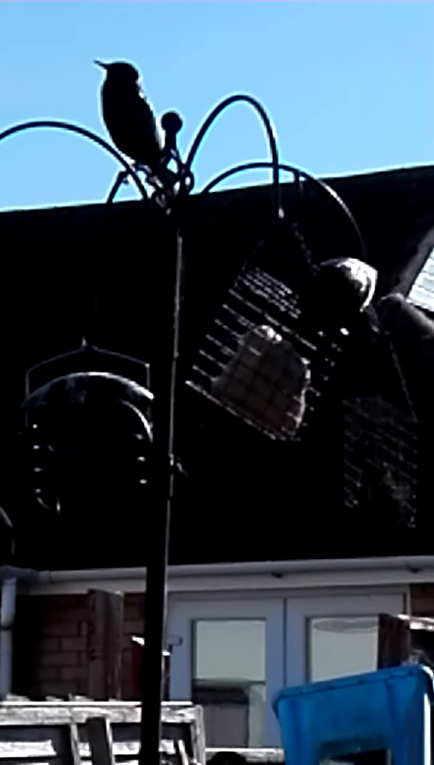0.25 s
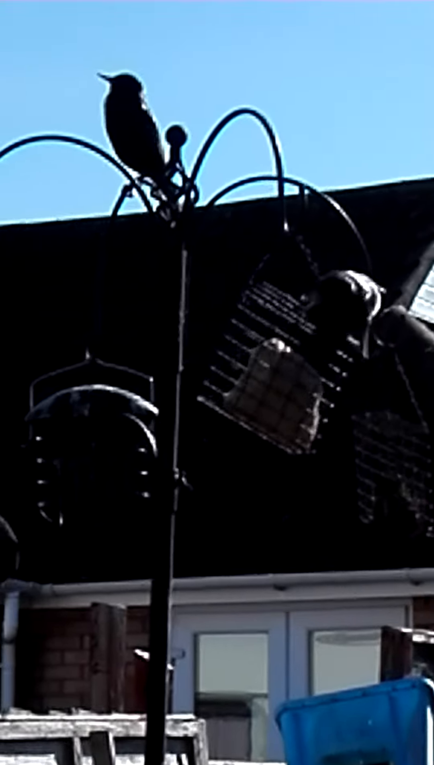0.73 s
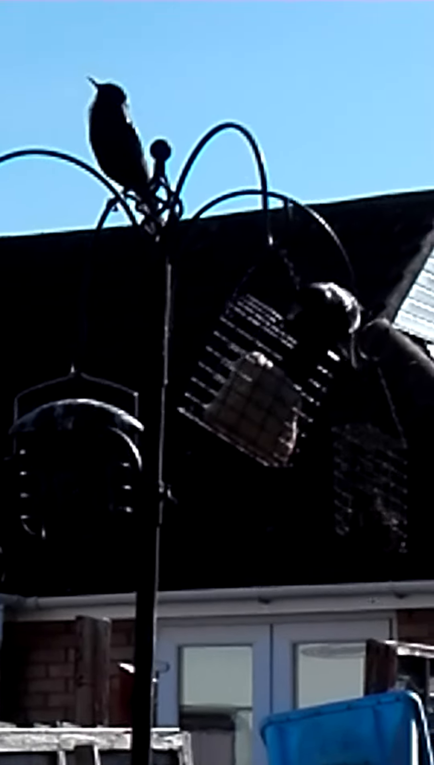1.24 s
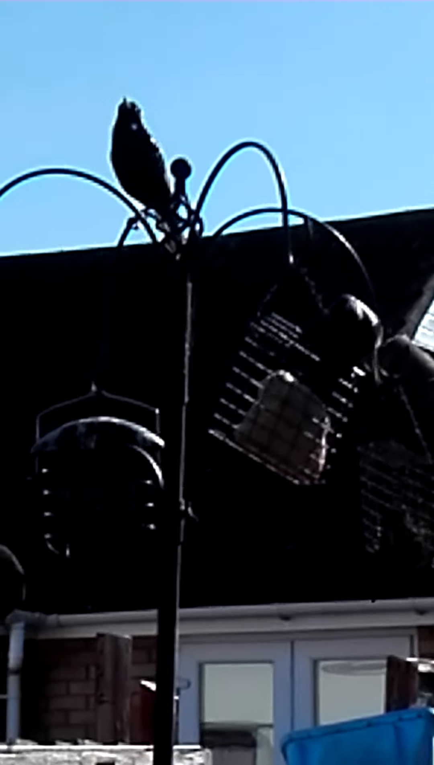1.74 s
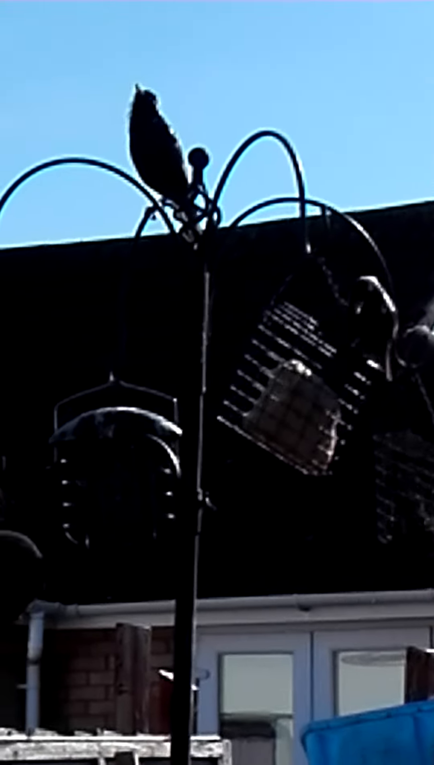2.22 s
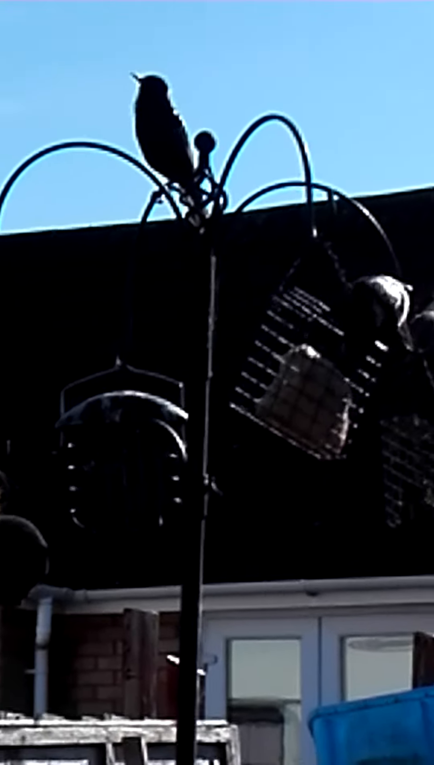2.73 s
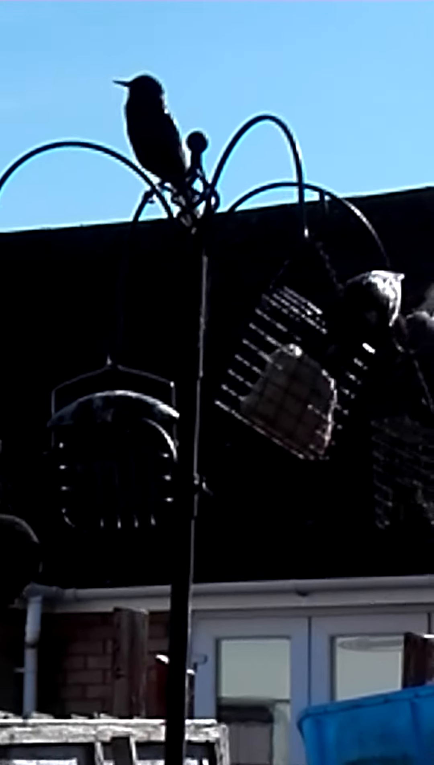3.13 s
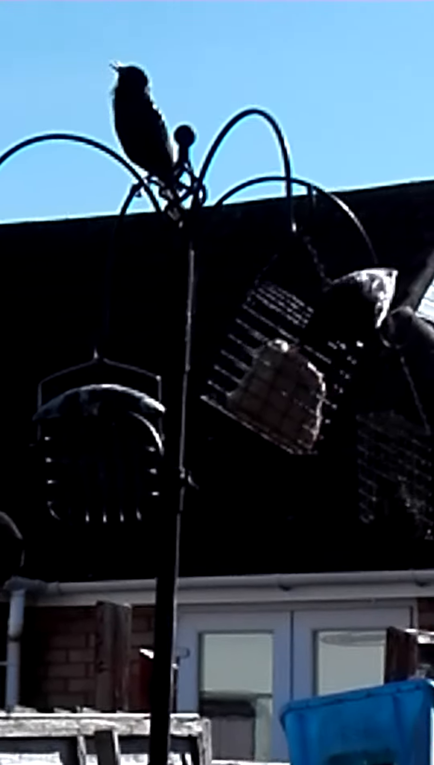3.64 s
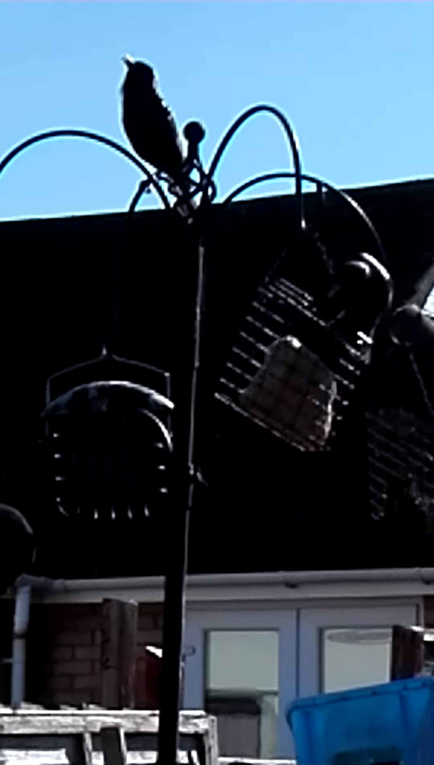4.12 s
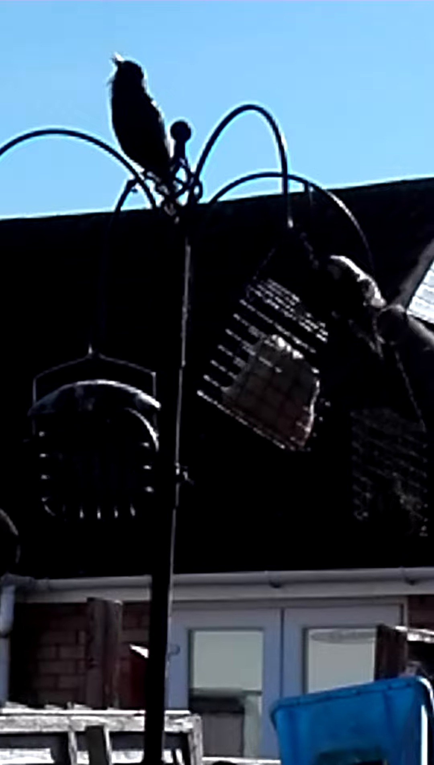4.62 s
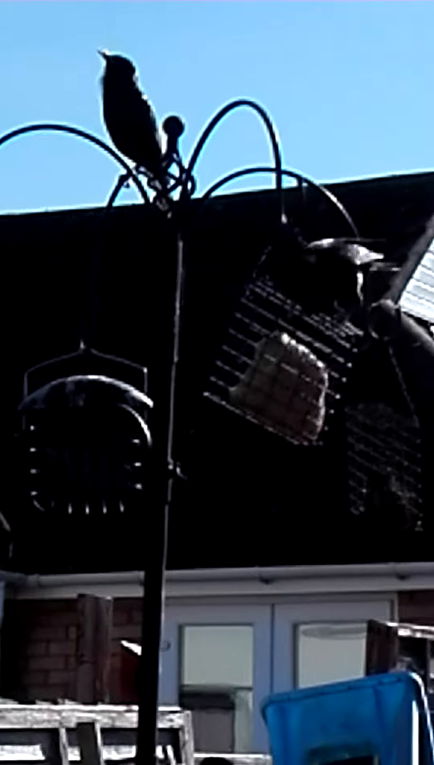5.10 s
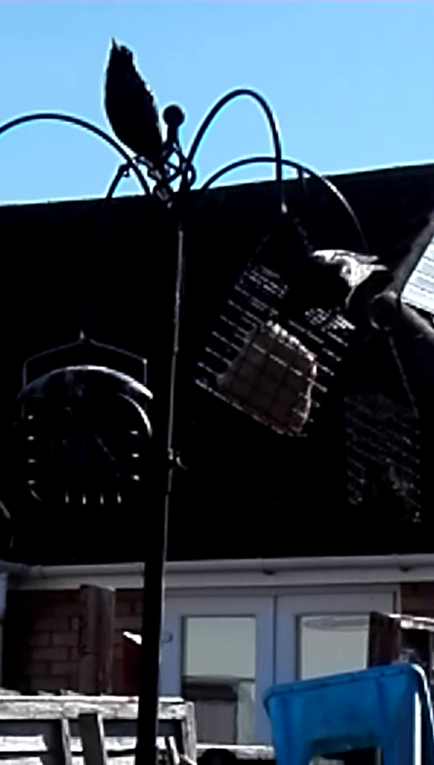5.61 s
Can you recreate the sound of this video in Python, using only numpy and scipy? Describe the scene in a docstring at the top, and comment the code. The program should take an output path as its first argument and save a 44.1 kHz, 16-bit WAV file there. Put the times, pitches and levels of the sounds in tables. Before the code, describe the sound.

Quiet garden birdsong: sparse small chirps and pure whistles, one sliding from very high to mid pitch over a dry clicking rattle, with faint breeze.

```python
"""In a small back garden, a starling sings from a feeder pole: soft chirps, an arched call, a rising whistle,
then a long whistle gliding down while the other side of its syrinx adds a dry rattle.
Faint hoarse twitters come from other birds farther off.
Whistles, chirps and twitters are near-sine tones, rattles are separate ringing pulses, rasps are shaped noise.
House walls and fences throw back short echoes; a light breeze rumbles on the microphone over faint hiss."""
import sys
import numpy as np
from scipy import signal
from scipy.fft import rfft, irfft, next_fast_len
from scipy.io import wavfile
from scipy.ndimage import uniform_filter1d

SR = 44100
rng = np.random.default_rng(int(sys.argv[2]) if len(sys.argv) > 2 else 0)


def store_wav(level_fs):
    """Save 16-bit WAV to argv[1]."""
    pcm = np.round(np.clip(np.atleast_2d(level_fs), -1, 1) * 32767)
    wavfile.write(sys.argv[1], SR, pcm.T.astype(np.int16))


N = 258426
TIME = np.arange(N) / SR  # seconds
CUTOFF_HZ = 14300  # top of the sound

# Gusts on the microphone: (start [s], length [s], peak level [dB])
GUSTS = [(.08, 0.27, -57), (1.49, .15, -50.5), (1.895, 0.11, -57.5), (2.4, 0.19, -57), (3.37, .2, -51.5),
         (4.11, 0.21, -52), (4.5, 0.53, -53), (5.046, 0.1, -45.5), (5.377, 0.29, -46.5), (5.66, 0.19, -52)]
BREEZE_DB, BREEZE_SWAY_DB = -58.5, 1.5  # between the gusts: usual level and spread
# Tone colours of the noises, relative levels: (frequency [Hz], level per Hz [dB])
BREEZE_COLOUR = [(14, -6), (28, 7), (42, 2.5), (55, -5.5), (80, -14), (125, -25), (160, -26), (210, -40.5),
                 (400, -64)]
HISS_COLOUR = [(120, -31), (200, 0.5), (223, -2.5), (252, -8.5), (285, -5.5), (329, -9), (400, -9),
               (581, -14), (973, -9.5), (1060, -9), (1690, -10.5), (2240, -14.5), (5080, -11), (7650, -17),
               (14000, -18.5)]
# Colour of what differs between left and right: (frequency [Hz], level per Hz [dB])
SIDE_COLOUR = [(200, -9), (600, -8), (3000, -13), (4500, -9.5), (9000, 6.5), (14000, 3)]
HISS_DB = -74.5  # the part of the hiss shared by both sides

# Short soft notes close by: (start [s], length [s], pitch [Hz], bend [octaves], peak level [dB])
CHIRPS = [(1.037, .035, 1235, -0.078, -56), (1.056, 0.048, 2953, 0.049, -52.5),
          (1.081, 0.031, 3056, .04, -47.5), (1.112, 0.049, 1234, -0.092, -58),
          (2.173, 0.084, 1189, -0.13, -54), (5.602, .022, 2540, -0.24, -63.5),
          (5.612, 0.043, 2205, 0.0098, -61)]
# Hoarse notes of other birds farther off, heard mostly by reflection, and at 2.1 s a faint companion tone of
# the arched call; levels before the mix: # (start [s], length [s], pitch [Hz], bend [octaves], peak level [dB])
TWITTERS = [(1.09, 0.045, 2780, -0.045, -66.5), (1.092, 0.037, 1716, -0.14, -72),
            (1.095, 0.036, 1416, -0.13, -61.5), (1.725, 0.067, 4370, -0.41, -75.5),
            (1.78, 0.082, 3970, -0.077, -78), (1.8, .075, 4330, 0.018, -75),
            (1.9, 0.075, 4020, -0.087, -76.5), (1.89, 0.084, 3516, -0.18, -74),
            (1.964, 0.046, 4910, -.08, -65.5), (2.1, 0.084, 3935, -0.1, -72),
            (2.652, 0.06, 4216, -0.024, -70), (4.965, 0.035, 3540, 0.25, -74),
            (5.012, 0.033, 3460, -0.33, -63), (5.643, .05, 6430, -0.096, -61),
            (5.645, 0.024, 5700, -.02, -67), (5.657, .04, 7100, -0.012, -67),
            (5.843, .03, 6030, -.04, -67.5)]

# Separate reflections: (delay [s], level [dB])
ECHOES = [(.0032, -19), (.0066, -10.5), (.0125, -21), (.024, -23), (.037, -25), (.047, -21.5),
          (.063, -21.5)]
# Blurred returns from nearby things, plants and far houses; the top is capped at CUTOFF_HZ:
# (level [dB], time to fall by 60 dB [s], top frequency [Hz])
TAILS = [(-8, 0.14, 6300), (-24, .36, 36000), (-13, 0.75, 860)]

# An arched call, a rising note and the long glide, before smoothing, trembling and gain:
# (time [s], pitch [Hz], level [dB])
ARCH_CALL = [(1.995, 2510, -71.5), (2.04, 2720, -61.5), (2.085, 2960, -59), (2.124, 2780, -45),
             (2.133, 2771, -37), (2.147, 2725, -32.5), (2.156, 2647, -39), (2.169, 2580, -34),
             (2.175, 2470, -48)]
RISING_NOTE = [(3.4, 3340, -74), (3.45, 3404, -40.5), (3.512, 3507, -32), (3.555, 3568, -40),
               (3.606, 3609, -31), (3.635, 3575, -40.5), (3.67, 3739, -45.5), (3.745, 3728, -53.5),
               (3.82, 3782, -62)]
LONG_GLIDE = [(3.987, 9290, -70.5), (4.0, 9240, -49), (4.068, 8600, -46), (4.1, 8300, -47.5),
              (4.135, 8140, -42.5), (4.21, 7200, -51), (4.28, 6580, -62), (4.36, 6290, -71),
              (4.44, 6220, -65.5), (4.55, 5557, -50), (4.625, 5460, -45), (4.705, 5280, -52.5),
              (4.835, 4826, -49.5), (5.015, 4373, -53.5), (5.056, 4230, -36.5), (5.098, 4223, -40.5),
              (5.125, 4132, -49), (5.28, 3960, -47), (5.46, 3672, -49), (5.51, 3494, -46),
              (5.6, 3404, -40.5), (5.642, 3280, -40), (5.662, 3222, -59), (5.785, 3153, -56.5),
              (5.845, 3000, -61.5)]
# A whistle's octave overtone at the usual level, weak at high pitch:
# (pitch [Hz], level relative to the fundamental [dB])
OVERTONE = [(3200, -30), (4000, -23.5), (4250, -50), (4900, -33.5), (5600, -62)]
USUAL_LEVEL_DB = -45
# Toward the end of the glide the voice tires: when, over how long, and how many times the tremble
TIRING_FROM_S, TIRING_S, TIRED_TREMBLE = 5.62, 0.047, 3.36

# Rasps in the throat: (start [s], length [s], peak level [dB])
RASPS = [(3.378, 0.062, -74), (5.61, 0.12, -64), (5.783, .16, -71)]
# Tone colour of the rasps: (frequency [Hz], level per Hz [dB])
RASP_COLOUR = [(1200, -20.5), (1750, -12.5), (2100, -7), (2700, -8), (3600, 2.5), (4200, -1), (4800, -1),
               (5700, -0.5), (7000, -22), (8500, -27)]

# Bursts of rattle, before random unevenness and detuning: (start [s], length [s],
# throat resonance [Hz], bend [octaves], pulse peak level [dB], ring time [s])
RATTLE_BURSTS = [(4.425, 0.29, 4220, -0.053, -66.5, 0.00076), (4.674, 0.073, 3440, -.05, -65, .0009),
                 (4.66, 0.26, 2200, -.06, -72, .0008), (4.83, 0.25, 3510, .06, -64.5, .0009),
                 (5.105, 0.34, 5110, -.05, -52, 0.00048), (5.325, 0.29, 4630, -0.18, -48.5, 0.00034),
                 (5.354, 0.046, 1840, .01, -70, .001), (5.618, 0.2, 4160, -0.078, -62, 0.00086),
                 (5.72, 0.11, 2750, -.05, -57.5, .00035), (5.763, 0.25, 1750, -.05, -68.5, 0.0014)]
# The pulses come at an easy rate, then speed up toward the end of the song, up to a limit
EASY_PER_S, HURRY_FROM_S, HURRY_PER_S2, FASTEST_PER_S = 63, 4.8, 83, 79


def from_db(db):
    """Turn decibels into a gain."""
    return 10 ** (np.asarray(db) / 20)


def rms_one(x):
    """Scale to an average strength (rms) of 1."""
    return x / np.sqrt(np.mean(x ** 2) + 1e-20)


def drift(rate_hz):
    """Smooth random motion of spread 1; a higher rate wanders faster."""
    # Made at every 20th sample, then joined up with straight lines
    memory = np.exp(-40 * np.pi * rate_hz / SR)
    noise = rng.standard_normal(N // 20 + 2002)
    slow = signal.lfilter([1], [1, -2 * memory, memory ** 2], noise)[2000:]  # skip the filter's start-up
    return np.interp(np.arange(N) / 20, np.arange(len(slow)), rms_one(slow))


def coloured_noise(colour):
    """Noise of rms 1 whose balance of low and high follows a colour table."""
    size = next_fast_len(N)
    hz, db = np.transpose(colour)
    bins = np.maximum(np.fft.rfftfreq(size, 1 / SR), 1)
    gain = from_db(np.interp(np.log(bins), np.log(hz), db))
    gain = gain * np.minimum(bins / hz[0], 1) ** 2  # fade below the first row
    spectrum = rfft(rng.standard_normal(size)) * gain
    return rms_one(irfft(spectrum, size)[:N])


def swell(start_s, length_s, sharpness):
    """An arch from nothing up to one and back; a low sharpness flattens its top."""
    progress = (TIME - start_s) / length_s
    on = (progress > 0) & (progress < 1)
    out = np.zeros(N)
    out[on] = np.sin(np.pi * progress[on]) ** sharpness
    return out


def bent(start_s, length_s, centre_hz, octaves):
    """A pitch that slides evenly through its centre in the course of a note."""
    progress = np.clip((TIME - start_s) / length_s, 0, 1)
    return centre_hz * 2 ** (octaves * (progress - .5))


def breeze(sharpness=0.51):
    """Low buffeting on the microphone: deep noise that sways gently and rises in gusts."""
    gusts = sum(from_db(peak_db) * swell(start_s, length_s, sharpness)
                for start_s, length_s, peak_db in GUSTS)
    steady = from_db(BREEZE_DB + BREEZE_SWAY_DB * drift(8.1))
    from_nearest_end_s = np.minimum(TIME, TIME[::-1])
    ease = np.sin(np.pi / 2 * np.minimum(from_nearest_end_s / .02, 1)) ** 2  # soft start and stop
    return ease * np.hypot(steady, gusts) * coloured_noise(BREEZE_COLOUR)


def background_hiss(side_db=-11.0):
    """Steady faint background hiss; opposite noise left and right makes it wider in the treble."""
    side = from_db(side_db) * coloured_noise(SIDE_COLOUR)
    return from_db(HISS_DB) * (coloured_noise(HISS_COLOUR) + np.array([side, -side]))


def syrinx(pitch_hz, level_db, overtone_db):
    """A vibrating membrane in the bird's voice organ: almost a sine, with weak second and third harmonics."""
    phase = 2 * np.pi * np.cumsum(pitch_hz) / SR
    third = from_db(overtone_db - 27) * (3 * pitch_hz < CUTOFF_HZ)
    wave = np.sin(phase) + from_db(overtone_db) * np.sin(2 * phase)
    wave = wave + third * np.sin(3 * phase)
    return np.sqrt(2) * from_db(level_db) * wave  # level is the rms of the fundamental


def chirps(notes, waver, flutter_db, overtone_db=-38, sharpness=1.2):
    """Brief soft notes that swell and slide; a fast tremble makes them hoarse."""
    out = np.zeros(N)
    tremble = 1 + waver * drift(200)
    flutter = flutter_db * drift(120)
    for start_s, length_s, centre_hz, octaves, peak_db in notes:
        pitch_hz = bent(start_s, length_s, centre_hz, octaves) * tremble
        gate = swell(start_s, length_s, sharpness)
        on = gate > 0
        out[on] += gate[on] * syrinx(pitch_hz[on], peak_db + flutter[on], overtone_db)
    return out


def garden(x):
    """Distinct wall echoes and three blurred tails, each with its own length and top; the longest is the dullest."""
    age = TIME[:SR // 2]
    response = np.zeros(len(age))
    for level_db, t60, top_hz in TAILS:
        scatter = rng.standard_normal(len(age)) * from_db(-60 * age / t60)
        scatter = scatter * np.minimum(age / 0.001, 1)  # soft start
        dull = signal.butter(2, min(top_hz, CUTOFF_HZ), fs=SR, output="sos")
        response += from_db(level_db) * signal.sosfilt(dull, scatter / np.linalg.norm(scatter))
    for delay_s, echo_db in ECHOES:
        response[int(delay_s * SR)] += from_db(echo_db)
    return signal.fftconvolve(x, response)[:N]


def in_time(rows):
    """Read each column of a timed curve at every sample."""
    s, *columns = np.transpose(rows)
    return [np.interp(TIME, s, column) for column in columns]


def sounding(rows, fade_s=.004):
    """One between the first and last row of a curve, with soft edges."""
    inside_s = np.minimum(TIME - rows[0][0], rows[-1][0] - TIME)
    return np.clip(inside_s / fade_s + 1, 0, 1)


def whistle(rows, waver, flutter_db, gain_db, bright_db, purity):
    """A held note whose pitch and strength tremble slightly; it grows purer as it swells."""
    # Muscles move smoothly, so the curves are averaged twice
    controls = uniform_filter1d(in_time(rows), size=160, axis=1)
    pitch_hz, level_db = uniform_filter1d(controls, size=160, axis=1)
    overtone_db = np.interp(pitch_hz, *np.transpose(OVERTONE)) + bright_db
    overtone_db = overtone_db - purity * (level_db - USUAL_LEVEL_DB)
    level_db = level_db + gain_db + flutter_db * drift(50)
    tiring = np.interp(TIME, [TIRING_FROM_S, TIRING_FROM_S + TIRING_S], [1, TIRED_TREMBLE])
    tremble = waver * tiring * drift(100)
    return sounding(rows) * syrinx(pitch_hz * (1 + tremble), level_db, overtone_db)


def rasp(grain_db=3.5, sharpness=1.1):
    """Grainy hiss in the throat as a whistle starts up or breaks apart: noise with a quickly varying level."""
    level = sum(from_db(peak_db) * swell(start_s, length_s, sharpness)
                for start_s, length_s, peak_db in RASPS)
    return level * from_db(grain_db * drift(170)) * coloured_noise(RASP_COLOUR)


def rattle(uneven_db=2.0, jitter=.045, scatter=0.075, sharpness=0.28, sag=0.088):
    """Slow separate pulses, each ringing the throat for a few cycles that sag in pitch."""
    hurry = HURRY_PER_S2 * np.maximum(TIME - HURRY_FROM_S, 0)
    per_s = np.minimum(EASY_PER_S + hurry, FASTEST_PER_S)
    cycles = np.cumsum(per_s * (1 + jitter * drift(30))) / SR
    pulses = np.flatnonzero(np.diff(np.floor(cycles)))  # one pulse per whole cycle
    chance = rng.standard_normal((len(RATTLE_BURSTS), 600, 2))
    age = TIME[:SR // 60]
    out = np.zeros(N)
    for burst, draws in zip(RATTLE_BURSTS, chance):
        start_s, length_s, centre_hz, octaves, peak_db, ring_s = burst
        throat_hz = bent(start_s, length_s, centre_hz, octaves)
        effort = swell(start_s, length_s, sharpness)
        rung = age / ring_s
        ring = (rung / 2) ** 2 * np.exp(2 - rung)  # rises to one, then dies away
        for i, (strength, detune) in zip(pulses[effort[pulses] > 0], draws):
            pulse_hz = throat_hz[i] + scatter * detune / ring_s  # a shorter ring has a looser pitch
            tone = np.sin(2 * np.pi * pulse_hz * age - sag * (rung - 2) ** 2)
            gain = effort[i] * from_db(peak_db + uneven_db * strength)
            out[i:i + len(age)] += (gain * ring * tone)[:N - i]
    return out


def scene(twitter_direct_db=-3.0, twitter_echo_db=1.5, rattle_echo_db=4.5):
    """Clear notes come straight from the pole; rattles and far twitters arrive with far more reflection."""
    clear = whistle(ARCH_CALL, waver=0.0027, flutter_db=2.5, gain_db=-1.0, bright_db=0.5, purity=.03)
    clear = clear + whistle(RISING_NOTE, waver=0.00076, flutter_db=0.5, gain_db=0.5,
                            bright_db=-2.0, purity=0.4)
    clear = clear + whistle(LONG_GLIDE, waver=0.0036, flutter_db=3.0, gain_db=-0.94,
                            bright_db=-3.5, purity=0.84)
    clear = clear + chirps(CHIRPS, waver=0.0054, flutter_db=0.95, sharpness=2.9)
    clear = clear + rasp()
    pulses = rattle()
    twitters = chirps(TWITTERS, waver=0.016, flutter_db=4.0, sharpness=1.3)
    to_garden = clear + from_db(rattle_echo_db) * pulses + from_db(twitter_echo_db) * twitters
    direct = clear + pulses + from_db(twitter_direct_db) * twitters
    return direct + garden(to_garden) + breeze() + background_hiss()


def record(dry):
    """Cut the top steeply, filtering forwards and backwards so nothing is delayed."""
    steep = signal.ellip(10, .05, 60, CUTOFF_HZ, fs=SR, output="sos")
    return signal.sosfiltfilt(steep, dry)


dry = scene()
out = record(dry)
store_wav(out)
```